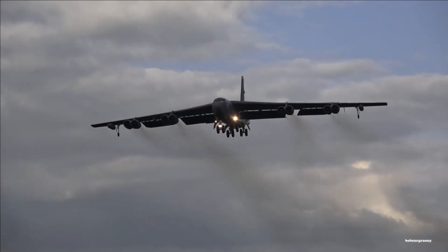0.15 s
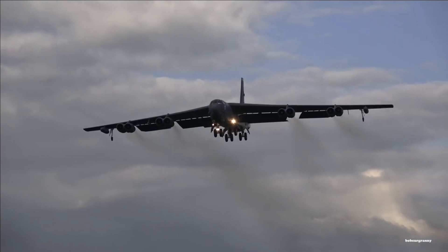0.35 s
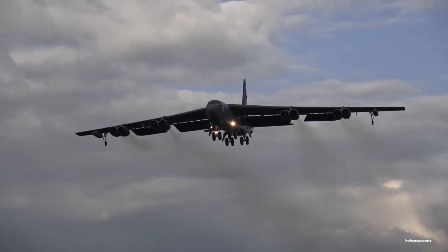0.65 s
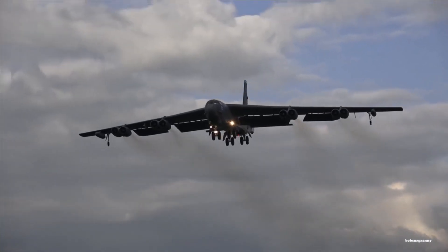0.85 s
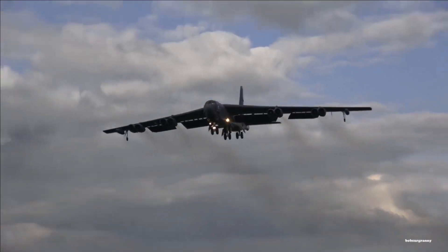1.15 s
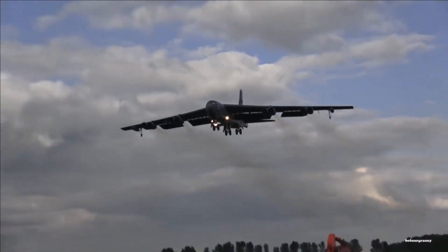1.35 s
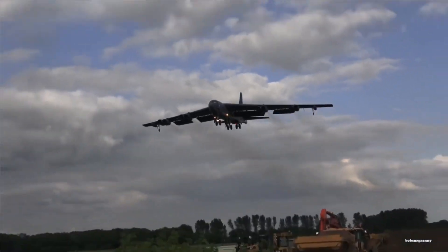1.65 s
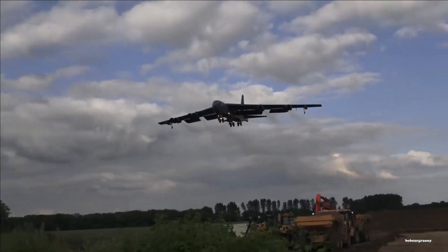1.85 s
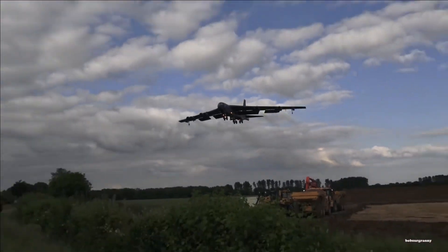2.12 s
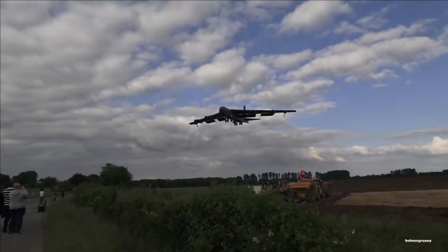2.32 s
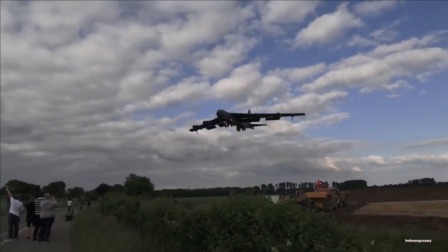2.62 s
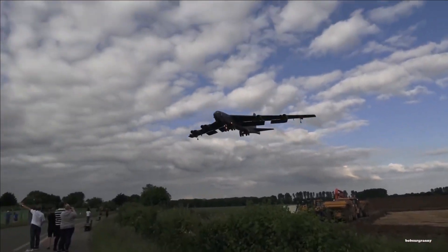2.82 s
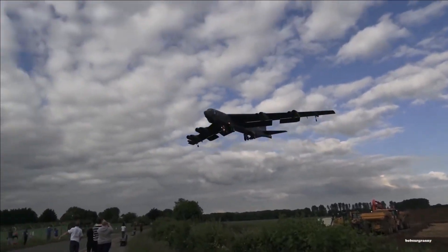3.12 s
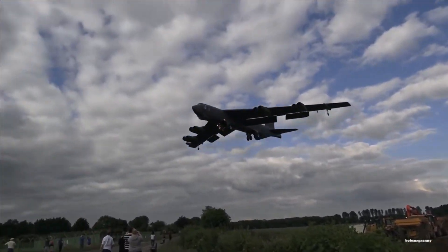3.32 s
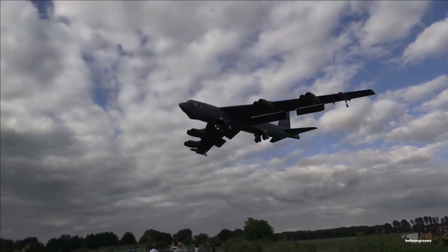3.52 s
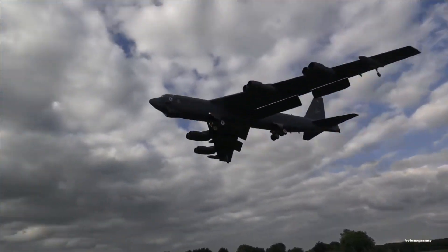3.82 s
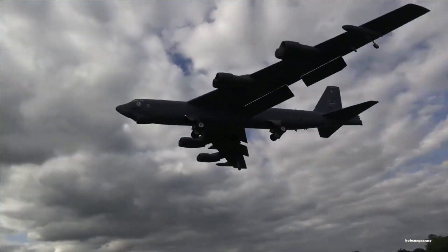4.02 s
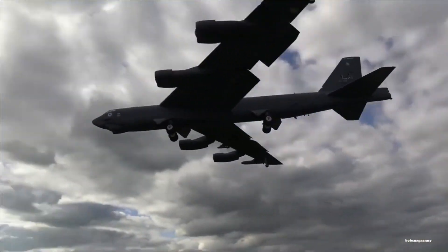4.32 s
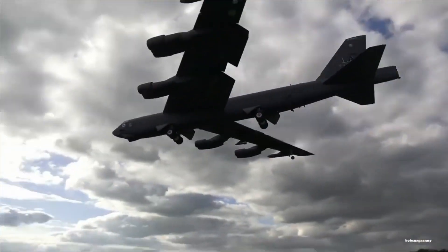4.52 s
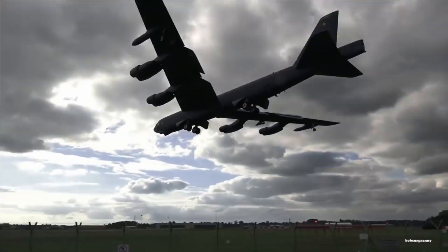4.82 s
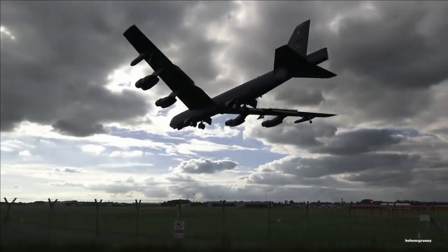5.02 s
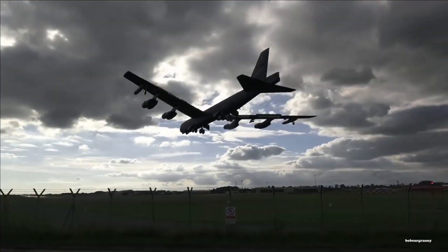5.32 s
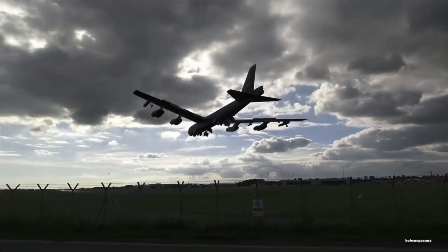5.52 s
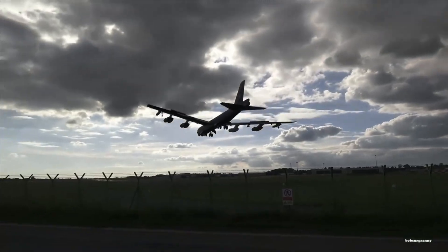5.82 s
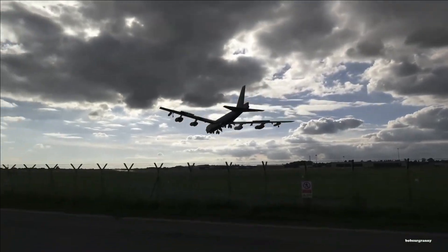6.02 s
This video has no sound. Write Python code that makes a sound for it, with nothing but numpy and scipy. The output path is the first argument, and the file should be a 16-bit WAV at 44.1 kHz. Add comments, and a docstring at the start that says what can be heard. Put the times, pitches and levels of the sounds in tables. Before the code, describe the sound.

In an open field, a heavy multi-engine jet approaches low on landing. Several close, high fan tones beat and waver over a broad roar with a hollow, surging band. The overtones sharpen to a piercing scream as it passes, the pitch slides steeply down, hiss peaks, then everything dulls and fades. Camera microphone, outdoors, slightly stronger on the right throughout.

```python
"""A large jet on final approach passes low overhead, heard from a field on a camera microphone.
Fan whine sinks in pitch by Doppler shift, the near wing faster than the far one, then by spool-down.
Whine: seven wavering tones steepened into overtones and sum tones; an eighth fan gives its octave only.
Roar: half-octave noise bands, heard directly and again off the ground; a hollow band surges and sags."""
import sys
import numpy as np
from scipy import signal
from scipy.fft import rfft, irfft, next_fast_len
from scipy.io import wavfile
from scipy.ndimage import uniform_filter1d

SR = 44100
rng = np.random.default_rng(int(sys.argv[2]) if len(sys.argv) > 2 else 0)


def generate_wav(sig):
    """Save sig (samples, or channels by samples) to the path in sys.argv[1] as 16-bit PCM at SR."""
    pcm = np.round(np.clip(np.atleast_2d(sig).T, -1, 1) * 32767).astype(np.int16)
    wavfile.write(sys.argv[1], SR, pcm)


N = 271656
STEP = 64  # samples per control value
EARS = np.array([[1], [-1]])  # sign of the left-right difference


def undb(db):
    """Amplitude of a level in dB."""
    return 10 ** (np.asarray(db) / 20)


def unit(x):
    """Scale to RMS 1."""
    return x / np.sqrt(np.mean(np.abs(x) ** 2))


def control_s():
    """Times of the control values."""
    return np.arange(N // STEP + 2) * STEP / SR


def curves(table):
    """Columns of a time table at the control rate."""
    s, *columns = np.transpose(table)
    return np.array([np.interp(control_s(), s, c) for c in columns])


def at(points, hz):
    """Value of a (f/Hz, value) table on a log-frequency axis."""
    table_hz, values = np.array(points).T
    return np.interp(np.log(hz), np.log(table_hz), values)


def walk(rate_per_s):
    """Random levels held 1 / rate_per_s and slewed twice, at the control rate; RMS 1."""
    hold, count = int(SR / STEP / rate_per_s), N // STEP + 2
    held = np.repeat(rng.standard_normal(count // hold + 1), hold)
    slewed = uniform_filter1d(uniform_filter1d(held, hold), hold)
    return unit(slewed[:count])


def smooth(slow):
    """Control values joined by straight lines, one value a sample."""
    return np.interp(np.arange(N) / STEP, np.arange(len(slow)), slow)


def hump(hz, width_hz, db, flutter_db=4.0):
    """Noise in a moving band: low-passed noise carried up to the centre, its level fluttering."""
    lowpass = signal.butter(2, width_hz / 2, fs=SR, output="sos")
    slow = signal.sosfilt(lowpass, rng.standard_normal((2, N)))
    phase = 2 * np.pi * np.cumsum(smooth(hz)) / SR
    band = unit(slow[0] * np.cos(phase) + slow[1] * np.sin(phase))
    return band * smooth(undb(db + flutter_db * walk(11)))


def lean(pan_db):
    """Gains of the left and right ear."""
    return np.array([smooth(undb(pan_db / 2)), smooth(undb(-pan_db / 2))])


def fan_pitch():
    """Heard pitch of each fan: Doppler shift on a straight flight path, times fan speed."""
    # Fans: blade-passing pitch at rest [f/Hz], closest [t/s], closest distance [m], speed creep [1/s]
    fan_table = [(1810.3, 4.591, 50.2, 0.0072), (2031.3, 4.721, 89.3, 0.0043),
                 (2088.9, 4.551, 56.7, 0.0023), (2179.7, 4.814, 105.1, 0.0038),
                 (2181.3, 4.575, 53.5, 0.002), (2247.0, 4.744, 87.6, 0.0019), (2269.9, 4.674, 82.8, 0.003),
                 (1982.5, 4.59, 51.3, 0.007)]
    speed_m_s, sound_m_s = 87.33, 343
    throttle_back_s, spool_down_per_s = 4.78, .0869
    heard_s = control_s()
    sent_s = np.arange(-2, 8, .005)
    rows = []
    for rest_hz, closest_s, closest_m, creep_per_s in fan_table:
        along_m = speed_m_s * (sent_s - closest_s)
        away_m = np.hypot(along_m, closest_m)
        arrival_s = sent_s + (away_m - closest_m) / sound_m_s
        doppler = 1 / (1 + speed_m_s * along_m / away_m / sound_m_s)
        shift = np.interp(heard_s, arrival_s, doppler)
        spool_down = spool_down_per_s * np.maximum(heard_s - throttle_back_s, 0)
        rows.append(rest_hz * shift * (1 + creep_per_s * heard_s - spool_down))
    return np.array(rows)


def faded(db, depth_db, rate_per_s):
    """Turbulent air fades each tone in and out; their summed power stays as tabled."""
    shaken = db + depth_db * np.array([walk(rate_per_s) for _ in db])
    return shaken + 10 * np.log10(np.sum(undb(2 * db), axis=0) / np.sum(undb(2 * shaken), axis=0))


def fans(pitch):
    """Tones smeared by eddies; loud waves steepen, breeding overtones and sums of neighbouring tones."""
    # Mean strength of each of seven fan tones: t/s, then level/dB per fan
    tone_table = [(0.0, -20, -15, -16, -22, -25, -18, -35), (0.15, -26, -17, -30, -19, -15.5, -23, -23),
                  (0.3, -24.5, -16, -27, -19, -24, -18.5, -21),
                  (0.45, -24.5, -18, -23, -19.5, -23, -22, -28.5),
                  (0.6, -29, -18, -23, -22, -23, -25, -22.5), (0.75, -26, -14, -20, -18, -26, -26, -19.5),
                  (0.9, -28, -20.5, -17.5, -15, -18, -24, -23), (1.05, -23, -19, -19, -19, -21, -25, -41),
                  (1.2, -27, -35, -17.5, -15, -22.5, -20, -24.5),
                  (1.35, -26, -15, -19, -29, -16.5, -34, -30), (1.5, -27, -24, -16.5, -20, -17.5, -37, -25),
                  (1.65, -23, -41, -20, -22, -20, -41, -27), (1.8, -24.5, -23, -19.5, -23, -20.5, -31, -36),
                  (1.95, -23.5, -25, -17.5, -27, -21.5, -28, -28),
                  (2.1, -29.5, -29, -22, -21, -22, -20.5, -23), (2.25, -24, -32, -19, -29, -19, -26, -35),
                  (2.4, -25, -35, -23.5, -24, -23, -20.5, -24), (2.55, -21, -23, -23, -31, -23, -20, -22),
                  (2.699, -21.5, -22, -34, -23, -22, -34, -28), (2.85, -21.5, -22, -28, -25, -20, -32, -36),
                  (3.0, -22, -22.5, -27, -27, -21, -42, -35), (3.151, -24, -24, -26, -33, -26, -45, -23),
                  (3.3, -24, -20, -24, -29, -29, -30, -25), (3.45, -21, -25, -32, -32, -29, -25, -26),
                  (3.6, -25.5, -28, -19.5, -37, -24, -19.5, -40),
                  (3.75, -21.5, -30, -26, -29, -41, -33, -22), (3.9, -28, -46, -24, -34, -28, -20.5, -29),
                  (4.0, -24, -56, -28, -35, -18, -25, -19), (4.1, -30, -56, -27, -31, -19, -24.5, -26),
                  (4.2, -23, -57, -34, -24, -28, -33, -24), (4.3, -37, -39, -32, -24, -28, -28, -33),
                  (4.399, -41, -32, -35, -32, -24.5, -33, -33), (4.5, -33, -41, -43, -32, -21, -37, -32),
                  (4.6, -33, -56, -42, -30, -25.5, -35, -42), (4.7, -36, -26, -46, -29, -22, -30, -35),
                  (4.8, -32, -24.5, -40, -51, -32, -30, -50), (4.901, -36, -32, -34, -30, -28, -30, -33),
                  (5.0, -32, -32, -26, -37, -20.5, -36, -31), (5.1, -55, -20, -29, -22, -22, -34, -25),
                  (5.2, -59, -21, -24, -35, -22, -38, -44), (5.299, -39, -22, -36, -36, -22.5, -22, -28),
                  (5.4, -40, -27, -42, -45, -27, -49, -48), (5.5, -36, -30, -38, -30, -42, -26, -36),
                  (5.601, -28, -32, -41, -42, -35, -36, -35), (5.7, -46, -32.5, -37, -46, -30, -46, -46),
                  (5.8, -39, -38, -47, -54, -35, -54, -52), (5.9, -47, -45, -39, -43, -36, -43, -41),
                  (6.0, -50, -40, -51, -41, -37, -36, -39), (6.16, -40, -43, -57, -44, -43, -44, -34.5)]
    # Mean strength of each fan's own octave: t/s, then level/dB per fan
    octave_table = [(0.0, -51, -43, -65, -38, -43, -58, -53), (0.22, -50, -39, -48, -31.5, -39, -35, -39),
                    (0.45, -60, -33, -46, -37, -53, -35, -51), (0.67, -59, -30.5, -31, -35, -25, -53, -47),
                    (0.9, -55, -46, -42, -33, -37, -50, -65), (1.12, -50, -37, -31, -30, -31, -47, -48),
                    (1.35, -50, -27, -36, -44, -33, -43, -48), (1.57, -50, -48, -35, -33, -38, -54, -49),
                    (1.8, -66, -40, -24, -32, -36, -50, -59), (2.02, -54, -41, -30, -31, -34, -37, -39),
                    (2.25, -67, -42, -27.5, -40, -32, -41, -43),
                    (2.47, -49, -47, -33.5, -32, -39, -40, -35), (2.7, -48, -35, -40, -35, -34, -42, -38),
                    (2.92, -34, -50, -34, -41, -47, -34, -37), (3.15, -41, -35, -30, -35, -32, -36, -34),
                    (3.37, -38, -39, -37, -45, -30, -35, -41), (3.6, -40, -46, -41, -55, -30.5, -36, -40),
                    (3.82, -38, -44, -31, -38, -36, -32, -30), (3.9, -44, -62, -35, -29, -34, -31, -31),
                    (4.05, -31, -52, -38, -57, -33, -33, -37), (4.2, -33, -56, -47, -45, -41, -34, -45),
                    (4.35, -49, -42, -43, -55, -31, -43, -45), (4.5, -41, -56, -45, -51, -29, -61, -61),
                    (4.65, -32, -41, -45, -55, -38, -47, -44), (4.8, -57, -36, -54, -42, -36, -40, -42),
                    (4.95, -28, -34, -46, -35, -34, -32, -35), (5.1, -34, -37, -43, -44, -36, -37, -37),
                    (5.25, -36, -40, -40, -35, -41, -28, -28), (5.4, -42, -42, -43, -36, -40, -31, -33),
                    (5.55, -53, -33, -43, -39, -41, -41, -36), (5.7, -41, -39, -45, -44, -53, -40, -44),
                    (5.85, -68, -40, -49, -40, -56, -46, -49), (6.0, -48, -42, -56, -56, -54, -55, -40),
                    (6.16, -52, -59, -55, -46, -45, -45, -54)]
    # Steepening: t/s, sums of three tones [level/dB], higher overtones re octave [level/dB],
    # blur of the tones [level/dB], haze round the tones [level/dB], haze round the octave [level/dB]
    shrill_table = [(0, -55, -25, -14, -42, -45), (.6, -46, -18.5, -14, -42, -42),
                    (1.8, -47, -10.5, -15, -42, -42), (3, -60, -10, -15.5, -42, -42),
                    (4, -54, -6, -12, -38, -38), (4.5, -60, -3, -11, -39, -36),
                    (4.9, -62, -9, -11, -37, -35), (5.12, -64, -21, -11, -37, -36),
                    (5.5, -66, -24, -9.5, -38, -38), (5.85, -66, -24, -9.5, -40, -43),
                    (6.16, -67, -24, -10, -38, -46)]
    # Fans on one wing share a path, so their tones breed a sum tone: index of fan a, index of fan b
    # The eighth fan pairs with itself: heard by its octave alone
    pair_table = [(7, 7), (2, 4), (1, 6), (3, 5)]
    # Sum tone of each pair: t/s, then level/dB per pair
    pair_level_table = [(0, -53, -49, -45, -44), (.4, -41, -32, -35, -34.5), (.8, -45, -35.5, -37, -37),
                        (1.6, -37.5, -37, -30, -38), (2, -41, -37, -35, -49), (2.4, -36, -35, -37, -49),
                        (2.8, -39, -52, -46, -44), (3.2, -40, -43, -42, -42), (3.6, -43, -29, -54, -49),
                        (4, -47, -58, -52, -40), (4.399, -48.5, -53, -30, -49), (5.2, -55, -59, -56, -55),
                        (6.16, -62, -64, -63, -57)]
    # Haze bands: multiple of the mean fan pitch [1], width [f/Hz]
    haze_table = [(1.07, 168), (2.1, 300)]
    wander_hz = 1.6  # moving air lets each pitch waver
    triple_db, upper_db, blur_db, *haze_db = curves(shrill_table)
    blur = undb(blur_db)

    def scatter():
        """Eddies scatter the phase of the octave band."""
        return smooth(np.exp(2.1j * blur * walk(60)))

    turns = []
    for hz in pitch:
        cycles = np.cumsum(smooth(hz + wander_hz * walk(12))) / SR + rng.random()
        turns.append(np.exp(2j * np.pi * cycles))

    whine = side = overtones = 0
    tone_levels = faded(curves(tone_table), 1.2, 14)
    octave_levels = faded(curves(octave_table), 2.7, 5.9)
    for k, (turn, tone_db, octave_db) in enumerate(zip(turns, tone_levels, octave_levels)):
        eddy = np.sqrt(2) * (1 + smooth(blur * (walk(70) + 1j * walk(70))))
        tone = smooth(undb(tone_db)) * turn * eddy
        whine = whine + tone
        side = side + 0.025 * (-1) ** k * tone  # the engines sit apart along the wings

        # Steps of -16 and -12 dB at a 2900 Hz pitch; air takes less from lower ones
        loss = (pitch[k] / 2900) ** 2
        fourth, fifth = smooth(undb(-16 * loss)), smooth(undb(-12 * loss))
        series = 1 + turn * fourth * (1 + turn * fifth)
        shake = smooth(np.exp(1.1j * walk(90)))  # eddies shake the phase of the short waves most
        upper = smooth(undb(upper_db + 1.75 * walk(9))) * turn * shake * series
        octave = turn * turn * eddy * scatter()
        octave_gain = smooth(undb(octave_db + walk(10)))
        overtones = overtones + octave_gain * (octave * (1 + upper)).real

    for (a, b), pair_db in zip(pair_table, curves(pair_level_table)):
        sum_tone = np.sqrt(2) * (turns[a] * turns[b] * scatter()).real
        overtones = overtones + smooth(undb(pair_db + 0.99 * walk(6.1))) * sum_tone

    shape = whine / np.sqrt(uniform_filter1d(np.abs(whine) ** 2, SR // 8))
    triples = smooth(undb(triple_db)) * shape ** 3
    mean_hz = pitch.mean(axis=0)
    haze = sum(hump(times * mean_hz, width_hz, db, flutter_db=3.5)
               for (times, width_hz), db in zip(haze_table, haze_db))
    return (whine + triples + side * EARS).real + overtones + haze


def hollow_band():
    """A hollow band of roar surges and sags: narrow noise of moving centre and level."""
    # Hollow band: t/s, f/Hz, level/dB
    hollow_table = [(0, 1338, -37), (.5, 1464, -30), (1, 1427, -27.5), (1.25, 1400, -26.5),
                    (1.45, 1365, -25), (1.6, 1310, -30.5), (1.85, 1296, -37.5), (2, 1475, -29),
                    (2.2, 1409, -32), (2.4, 1302, -29.5), (2.55, 1272, -35), (2.8, 1346, -32),
                    (3.4, 1383, -36.5), (3.8, 1253, -38), (6.16, 975, -56)]
    hollow_hz, hollow_db = curves(hollow_table)
    return hump(hollow_hz, 153, hollow_db, flutter_db=3.0)


def roar(fan_hz, roar_db, rumble_db, deep_db, treble_db, pan_db):
    """Noise bands swell together, flicker alone; the treble opens towards the pass and dulls after it."""
    # Roar spectrum, relative: f/Hz, level/dB
    colour_table = [(25, -17), (60, -9.5), (130, -7), (280, 3.5), (410, 3), (520, -4), (700, 0), (1100, 0),
                    (2000, 0), (3300, -1.5), (4200, -2.5), (5000, -5.5), (7000, -5.5), (10000, -21),
                    (12300, -27), (14000, -57)]
    # Unrelated noise in each ear: f/Hz, share [1]
    spread_table = [(30, .06), (70, 0.2), (130, 0.34), (280, 0.087), (600, 0.15), (1300, 0.13),
                    (3000, 0.15), (6000, 0.17), (9000, 0.47), (13000, 0.25)]
    # Part of the left-right level difference: f/Hz, share [1]
    lean_table = [(30, .25), (70, 1), (250, 0.67), (1200, 1), (4000, 0.77), (8000, 0.2), (13000, 0.56)]
    # Broad humps sinking with the fans: multiple of mean fan pitch [1], width [f/Hz], re roar [level/dB]
    hump_table = [(1.02, 267, -0.5), (3.102, 2260, -37)]
    # Roar round 660 Hz, which hollows out before the pass: t/s, level/dB
    middle_table = [(0, -1.5), (1.5, -2.5), (2.1, 0.5), (2.7, -2.5), (3.1, -2.5), (3.5, -3), (3.9, 1.5),
                    (5, 1.5), (6.16, 5)]
    # Roar under 70 Hz: t/s, level/dB
    sub_table = [(0, -1), (1, -6), (2, 2), (3.1, 10), (3.7, 1.5), (4.3, -6), (5, 0.5), (6.16, 6)]
    size = next_fast_len(N)
    hz = np.maximum(np.arange(size // 2 + 1) * SR / size, 1)
    noise = rfft(rng.standard_normal((2, size))) * undb(at(colour_table, hz) + 12.5)
    noise = noise[0] + at(spread_table, hz) * noise[1] * EARS
    swell, gust = walk(2.74), walk(14)
    (middle_db,), (sub_db,) = curves(middle_table), curves(sub_table)
    out = 0
    for centre_hz in 22 * 2 ** np.arange(0, 9.6, .5):
        window = np.cos(np.pi / 2 * np.clip(2 * np.log2(hz / centre_hz), -1, 1))
        band = irfft(noise * window, size)[:, :N]
        db = roar_db + rumble_db / (1 + (centre_hz / 336) ** 6)
        db = db + deep_db / (1 + (centre_hz / 200) ** 5) / (1 + (55 / centre_hz) ** 3)
        db = db + treble_db * (min(centre_hz, 11000) / 10000) ** 1.96
        db = db + sub_db / (1 + (centre_hz / 70) ** 4)
        db = db + middle_db * np.exp(-(np.log2(centre_hz / 660) / 0.38) ** 2)
        db = db + 0.42 * swell + 1.07 * walk(7) + 1.14 * gust * min(centre_hz / 7000, 1)
        db = db + 1.83 * walk(11) / (1 + (centre_hz / 900) ** 2)  # the low roar comes in lumps
        half_pan_db = at(lean_table, centre_hz) * pan_db / 2
        out = out + band * np.array([smooth(undb(db + ear * half_pan_db)) for ear in (1, -1)])
    for times, width_hz, hump_db in hump_table:
        centre_hz = times * fan_hz
        db = roar_db + hump_db + treble_db * (centre_hz / 10000) ** 1.5
        out = out + lean(pan_db) * hump(centre_hz, width_hz, db)
    return out


def ground(x):
    """A later, duller, inverted copy off the soft field combs the low roar."""
    # Ground echo: t/s, extra path [ms], level/dB
    ground_table = [(0, 2.17, -9.5), (1, 2.3, -14.5), (1.7, 1.92, -9), (2, 2.22, -5), (2.35, 2.2, -3.5),
                    (2.7, 2.35, -6), (3, 2.25, -6.5), (3.7, 2.3, -10.5), (4.1, 2.38, -13), (4.55, 2.8, -17),
                    (5.25, 2.04, -12), (5.6, 2.28, -24), (6.16, 2.44, -9)]
    delay_ms, echo_db = curves(ground_table)
    dull = signal.sosfilt(signal.butter(1, 1800, fs=SR, output="sos"), x)
    place = np.arange(N) - smooth(delay_ms) * SR / 1000
    echo = np.array([np.interp(place, np.arange(N), c) for c in dull])
    return x - smooth(undb(echo_db)) * echo


def scene():
    """Whine and hollow band over roar with ground echo, leaning right throughout."""
    # Roar: t/s, roar [level/dB], rumble re roar [level/dB], deepest rumble re roar [level/dB],
    # treble change at 10 kHz [level/dB], left minus right [level/dB]
    roar_table = [(0, -28, 8.5, -21, -42.5, -2.5), (.6, -28.5, 9, -16, -25, -2.5),
                  (1.2, -30.5, 6, -10, -19.5, -3), (1.8, -32.5, 6.5, -10, -11.5, -3.5),
                  (2.4, -34, 2.5, -5, 0, -4.5), (3, -31, -5, 7.5, 1.5, -5.5),
                  (3.3, -32.5, -2.5, 7.5, 9, -6), (3.6, -36.5, -5, 10, 14, -6),
                  (4, -34, 3.5, 1, 14.5, -7.5), (4.2, -32.5, 4.5, 1, 12, -7.5),
                  (4.45, -31.5, 4, 9.5, 14, -6.5), (4.75, -30, -5.5, 17, 15, -5),
                  (5.05, -30.5, -4.5, 9, 11.5, -4.5), (5.35, -33, -1, 7, 8, -4),
                  (5.7, -38, -5, 14.5, 3, -3.5), (6.16, -40.5, -5, 16.5, -3.5, -3.5)]
    roar_db, rumble_db, deep_db, treble_db, pan_db = curves(roar_table)
    pitch = fan_pitch()
    front = fans(pitch) + hollow_band()
    direct_roar = roar(pitch.mean(axis=0), roar_db, rumble_db, deep_db, treble_db, pan_db)
    return lean(pan_db) * front + ground(direct_roar)


def record(dry):
    """The camera limits the loudest beats within a millisecond and cuts the top above 13.9 kHz."""
    held = dry / (1 + uniform_filter1d((1.3 * dry) ** 2, size=30, axis=1))
    return signal.sosfilt(signal.ellip(10, .2, 80, 13900, fs=SR, output="sos"), held)


dry = scene()
out = record(dry)
generate_wav(out)
```